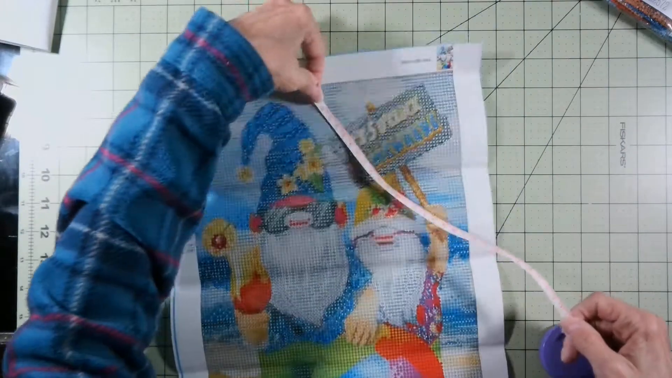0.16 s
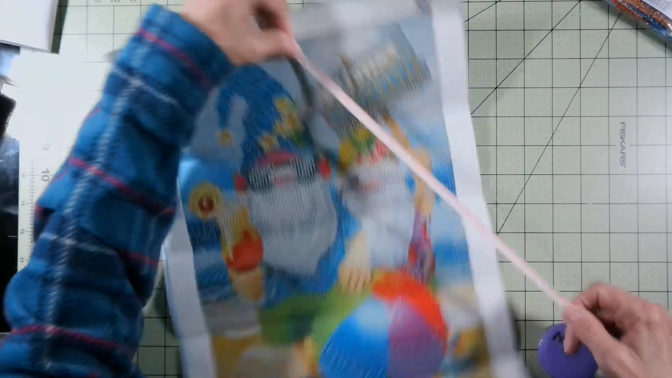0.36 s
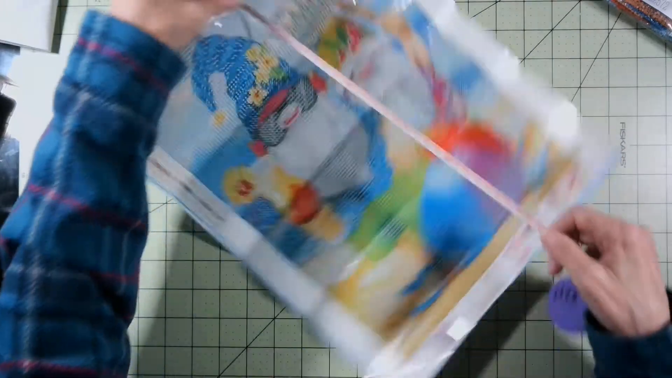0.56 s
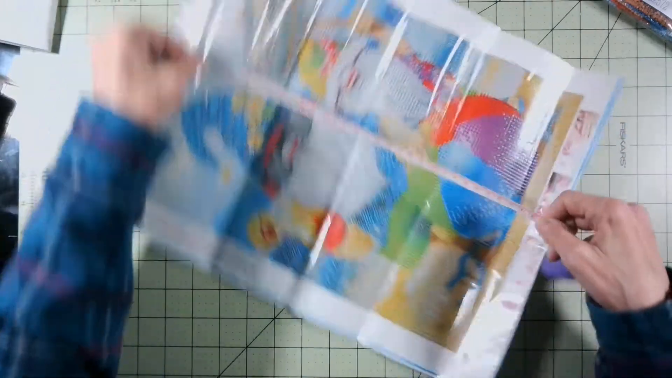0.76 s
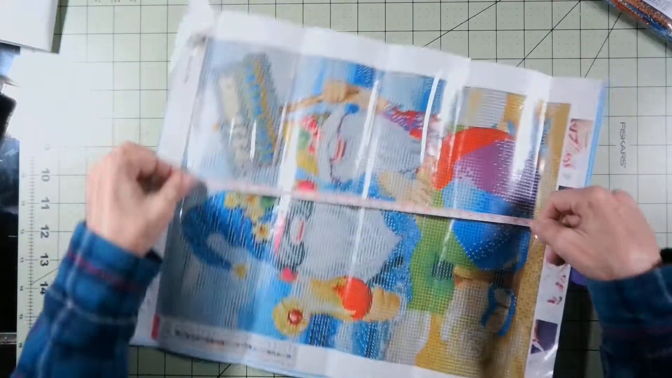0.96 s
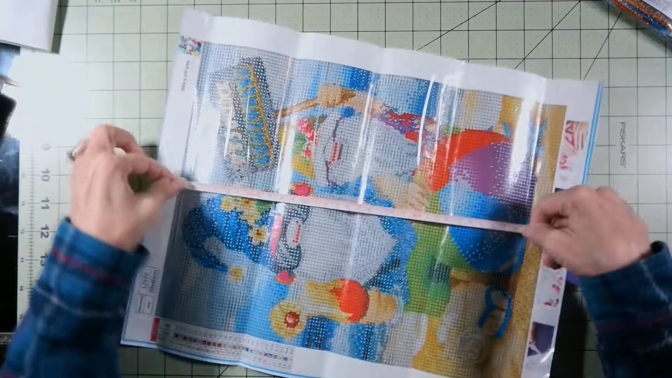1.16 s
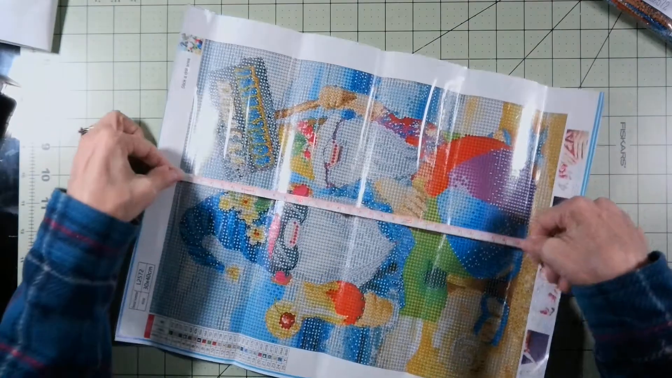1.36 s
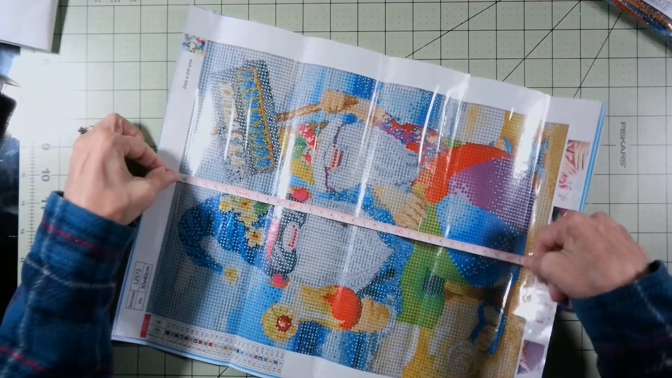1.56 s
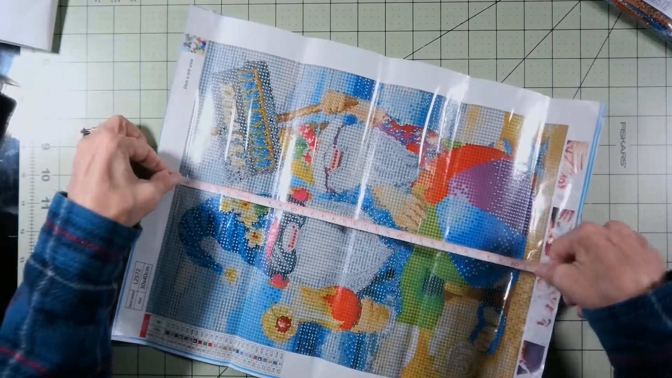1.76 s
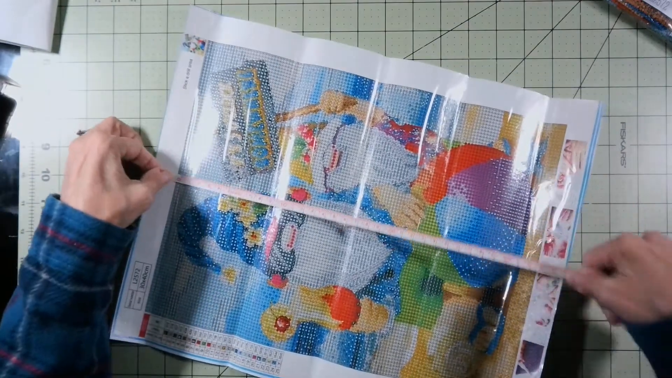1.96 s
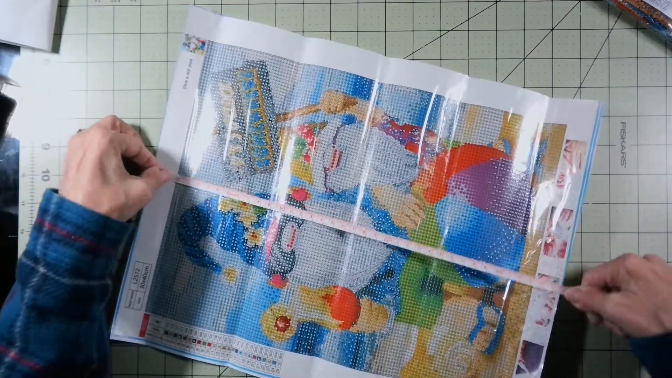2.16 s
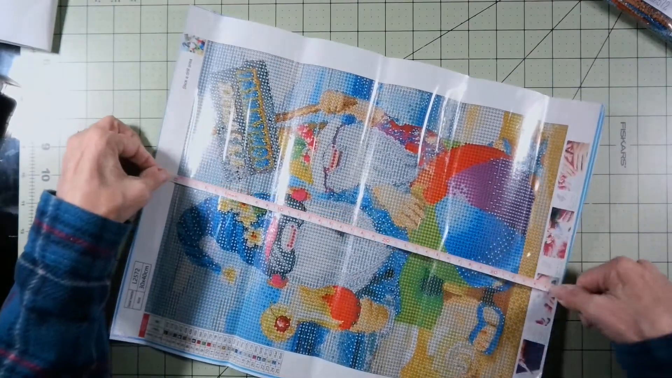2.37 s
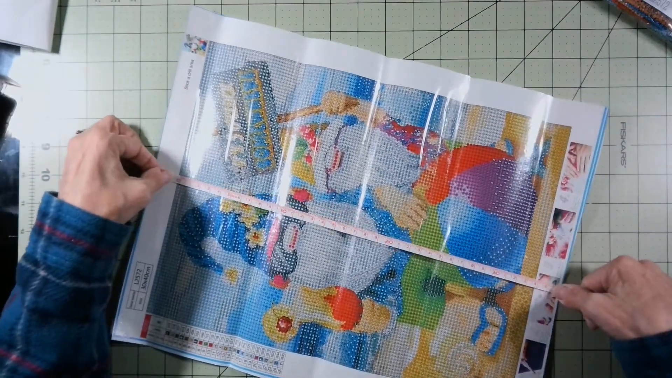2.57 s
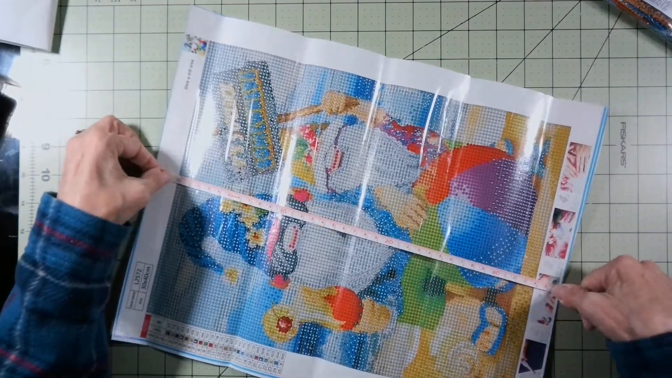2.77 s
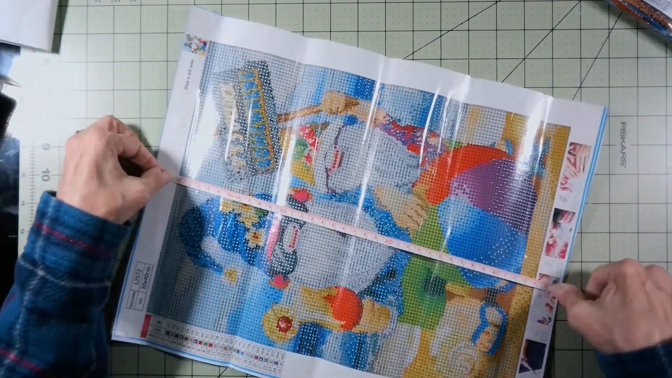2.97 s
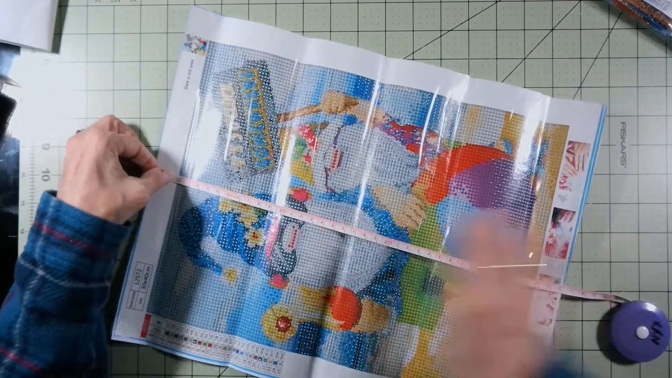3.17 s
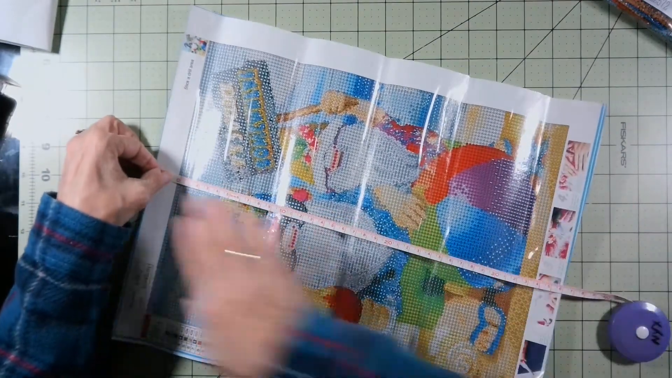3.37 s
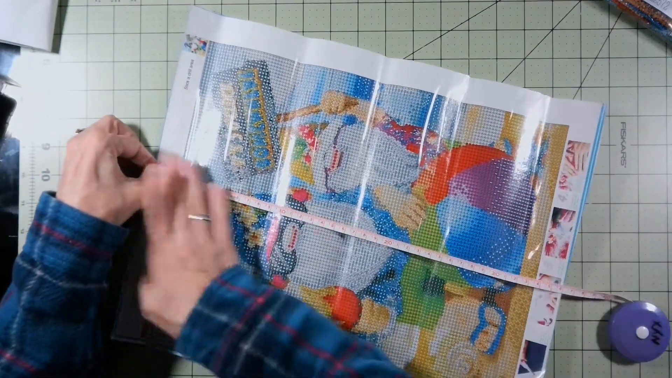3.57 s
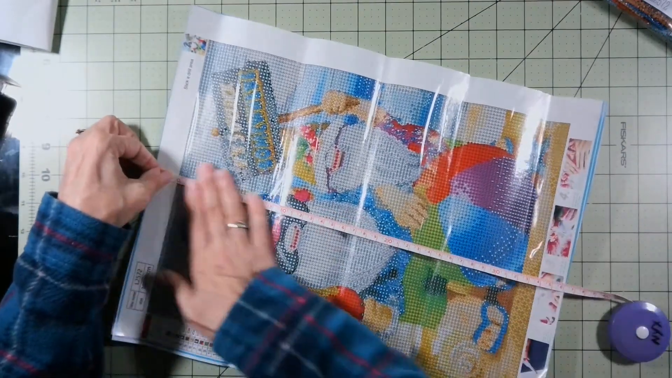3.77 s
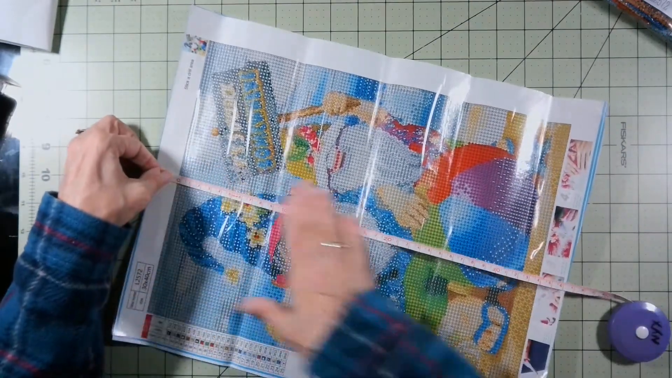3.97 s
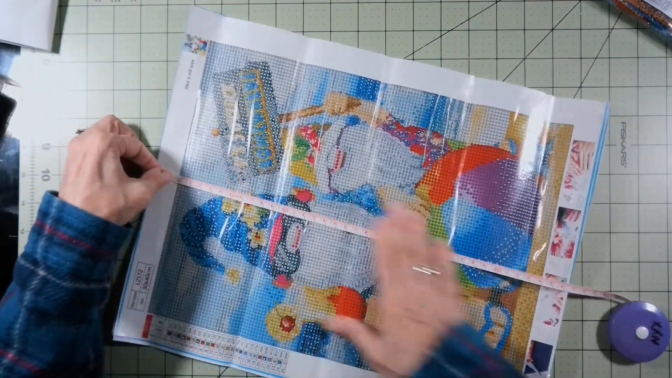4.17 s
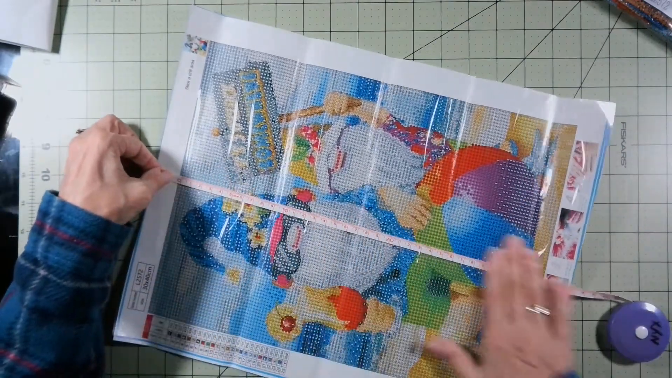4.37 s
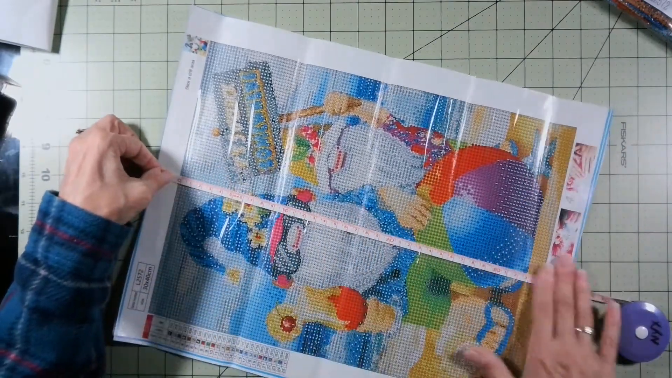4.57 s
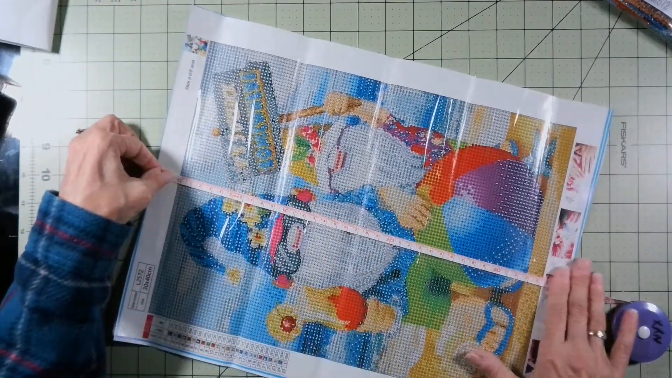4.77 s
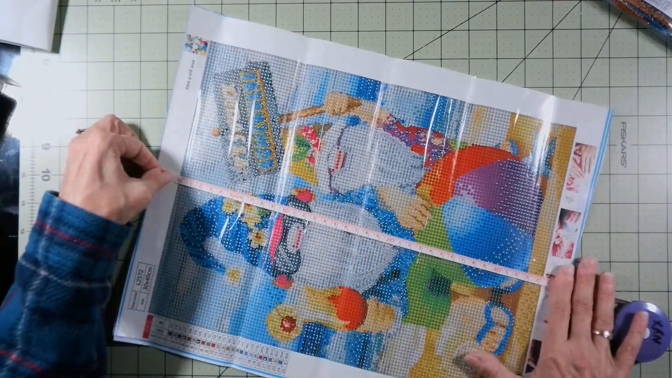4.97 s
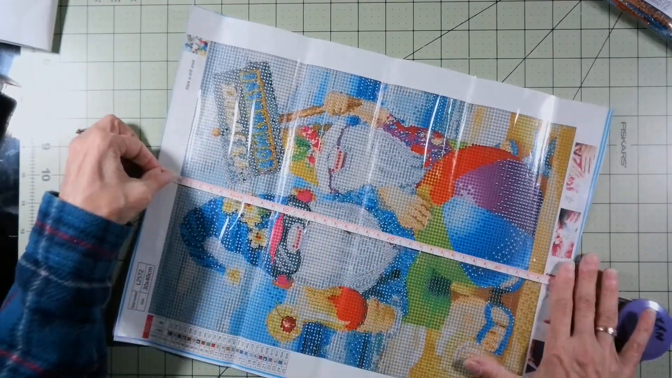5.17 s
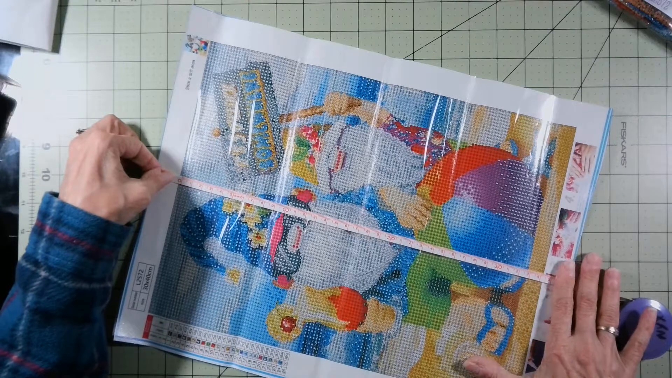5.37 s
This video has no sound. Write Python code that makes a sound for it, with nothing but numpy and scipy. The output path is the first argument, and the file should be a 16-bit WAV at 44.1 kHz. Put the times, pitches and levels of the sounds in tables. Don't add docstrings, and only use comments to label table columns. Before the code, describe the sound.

Close, dry stereo sound in a small room with a faint microphone hiss. A brief rustle opens, with a few crisp film snaps, then at about 0.25 s the film-covered canvas swings round on the mat: a grainy hiss swelling to its loudest near 0.55 s, dipping, and surging again around 0.85 s, stopping by 1.1 s. From 1.2 to 2.3 s come scattered crinkles, small ticks and a short scrape near 1.85 s as hands and tape settle. At 2.42 s one very hard, bright tap cracks out, slightly overloaded, with a short woody knock. Near quiet follows, then a sharp snap at 3.02 s and smaller ones after. At 3.6 s a palm lands with a soft low thump and sweeps until about 4.5 s, a steady hiss full of dense crackles, with a stronger rub near 3.96 s. Sparse tiny film ticks remain until 5.4 s.

```python
import sys
import numpy as np
from scipy import signal
from scipy.fft import rfft, irfft
from scipy.io import wavfile
from scipy.ndimage import uniform_filter1d

SR = 44100
rng = np.random.default_rng(int(sys.argv[2]) if len(sys.argv) > 2 else 0)


def transcribe(u):
    v = np.clip(np.atleast_2d(u).T, -1, 1)
    q = np.round(v * 32767).astype(np.int16)
    wavfile.write(sys.argv[1], SR, q)


def elevation(decibels):
    levels = np.asarray(decibels, float)
    return 10 ** (levels / 20)


N = 239110

# time in seconds, speed as level in dB, weight on the mat in dB.
SWING = [
    (.215, -57, 7),
    (.24, -36.5, -2),
    (.311, -40.5, -5),
    (.38, -35, -7),
    (.43, -30, -6),
    (.541, -24.5, -9),
    (.657, -40, -8.5),
    (.844, -31, -2),
    (1.02, -42.5, -9.5),
    (1.1, -63, -23),
]
# time in seconds, speed as level in dB.
SWEEP = [
    (3.6, -50),
    (3.72, -42.5),
    (3.85, -43),
    (3.893, -40.5),
    (3.997, -40.5),
    (4.081, -38.5),
    (4.113, -42),
    (4.266, -40.5),
    (4.496, -45.5),
    (4.69, -62),
]
# peak time in seconds, time to fade 20 dB in seconds,
# level in dB, weight in dB, brightness in dB.
BRUSHES = [(.005, 0.1, -30.5, -5, -2.5), (.07, .03, -47.5, -1, -8), (0.168, 0.065, -42, -4, 0),
           (1.088, 0.06, -53, -10, 9), (1.219, 0.1, -56.5, 2.2, -1), (1.367, 0.45, -56.5, -8, 2.5),
           (1.554, 0.2, -59.5, 3.5, 1), (1.715, 0.05, -56, -6, 3), (1.756, 0.3, -55.5, -5, 1),
           (1.81, 0.24, -63, 15.5, -3), (1.851, 0.048, -32.5, -15, -9), (1.9, .09, -53, -19, 12),
           (1.952, 0.065, -42.5, -8.5, -11), (2.1, 0.2, -67, -9, 12), (2.169, 0.6, -64.5, -8, -11),
           (2.27, 0.1, -58.5, -12.5, -11.5), (2.4, 0.5, -62.5, 1.6, 4.5), (2.634, 0.5, -66, -5.5, -5.5),
           (2.883, 0.15, -50.5, -7.5, -3), (2.995, 0.2, -51.5, -1.5, 1), (3.465, 0.6, -65.5, -15, 8),
           (3.959, 0.0444, -33.5, -8.5, 1.1), (4.301, 0.16, -46.5, -26, 16), (5.029, 1.5, -67.5, -1.7, 6.5),
           (5.332, .08, -58.5, -3, -2)]
# time in seconds, level in dB.
CRACKLE = [(0, -10), (.22, 2), (.3, -8), (.9, -4.5), (1.05, -1), (1.15, -9.5), (3.55, -10.5), (3.62, -5.5),
           (4.5, -3.5), (4.8, -6.5), (5.42, -8)]

# centre in Hz, width in Hz, level in dB.
RUBBED_CANVAS = [(750, 400, -10), (1400, 500, -0.5), (1950, 700, 0.5), (2800, 1400, -3)]
RUBBED_FILM = [(2620, 1500, -10.5), (3770, 1300, -2), (5620, 2020, 3), (7260, 3700, -2.5)]
RUBBED_FILM_TOP = [(10200, 6000, -7.5), (14100, 1900, 3), (15300, 1400, 1)]
TICKED_CANVAS = [(850, 500, -13), (1500, 600, -1), (2100, 900, 0), (2800, 1000, -6)]
FLIPPED_FILM = [(3800, 1600, -3), (5650, 2000, 2.5), (7800, 3000, -.5)]
FLIPPED_FILM_TOP = [(11000, 6000, -9), (14050, 1960, 3), (15440, 2100, -1.5)]
STRUCK_CANVAS = [(800, 400, -11), (1400, 550, 1), (1990, 890, -0.5), (2900, 1500, -4)]
STRUCK_FILM = [(3900, 1800, -4), (5600, 1100, 4.5), (7660, 1500, -8.5)]
STRUCK_FILM_TOP = [(10000, 3700, -6.5), (12900, 1800, 1), (15000, 1300, -0.5)]
TABLE_TOP = [(45, 15, 1.5), (130, 41, -3), (300, 170, -9.5), (600, 640, -16.5)]

# time in seconds, level in dB, brightness in dB.
TURN_AND_TAPE_SNAPS = [(0.0066, -39, 22), (0.0243, -23, 2), (0.1044, -29, -13), (0.1065, -38, 9), (0.1259, -38, 13),
                       (0.164, -34, 6), (0.1799, -31, -4), (0.2808, -28, 2), (0.3343, -24, 0), (0.3757, -16, 2),
                       (0.739, -20, 5), (0.7569, -31, 12), (0.787, -21, -2), (0.96, -37, 1), (0.9868, -25, 5),
                       (1.033, -28, 6), (1.0425, -41, 23), (1.0514, -45, 20), (1.0748, -39, 29), (1.0787, -46, 31),
                       (1.0915, -42, 24), (1.0952, -35, 11), (1.109, -38, 9), (1.1606, -43, -4),
                       (1.2294, -34, -2), (1.3257, -40, -6), (1.4796, -33, -4), (1.506, -21, -9), (1.608, -57, -3),
              (1.6837, -40, 20), (1.6866, -24, -15), (1.7037, -45, 15), (1.721, -30, 9), (1.738, -30, 4),
              (1.76, -28, 4), (1.89, -37, 12), (1.9191, -27, 13), (1.931, -36, 14), (1.9593, -32, 12),
              (2.008, -55, 19), (2.0307, -34, 3), (2.2441, -30, 5), (2.2617, -31, -30), (2.397, -48, 11),
              (2.523, -41, 12), (2.587, -57, 6), (2.7415, -44, 2), (2.77, -43, 0), (2.8474, -51, 12),
              (2.945, -35, -20), (3.0262, -12, 0), (3.0288, -17, -3), (3.0308, -24, -9), (3.0812, -17, -14),
              (3.0931, -26, -5),
                       (0.138, -34, -2), (0.1572, -38, 6), (0.789, -21, -1), (0.9761, -39, 11),
                    (1.036, -49, 22), (1.054, -46, 19), (1.0684, -56, 24), (1.1715, -55, 5),
                    (1.2239, -44, -5), (1.342, -45, -13), (1.3533, -46, 0), (1.4418, -52, 6),
                    (1.4471, -47, 6), (1.5222, -38, 3), (1.5539, -49, 8), (1.7654, -45, 10),
                    (1.7707, -45, 7), (1.9062, -39, 5), (1.9461, -39, 8), (2.019, -43, -11),
                    (2.0352, -41, -5), (2.1543, -43, -5), (2.4074, -55, 4), (2.8767, -48, 6),
                    (2.8871, -33, -11), (2.89, -42, 8), (2.8978, -52, 12), (3.0741, -26, -4),
                    (5.0106, -55, 9), (5.0295, -53, 10), (5.2292, -55, 5), (5.4075, -54, -2)]
# time in seconds, level in dB,
# brightness in dB.
PALM_AND_SETTLING_SNAPS = [(3.6132, -23, -13), (3.6159, -31, 12), (3.6259, -20, -3), (3.6313, -16, -16),
                           (3.6427, -28, -3), (3.7126, -27, 10), (3.7235, -28, -6), (3.7367, -38, 20), (3.7465, -24, 11),
                           (3.816, -25, -1), (3.9299, -27, 0), (3.947, -23, 0), (3.9589, -18, -1), (3.9874, -28, -22),
                           (4.0126, -25, -6), (4.0347, -22, -2), (4.039, -33, 5), (4.0563, -23, 0), (4.0975, -24, 1),
                           (4.1017, -21, -21), (4.122, -32, 18), (4.1322, -17, 3), (4.217, -30, -2), (4.2327, -29, -15),
                           (4.2557, -37, 13), (4.2872, -40, 28), (4.3223, -40, 20), (4.3665, -27, 4), (4.381, -24, 5),
                           (4.438, -39, 9),
                           (3.6096, -43, 18), (3.652, -29, -6), (3.6568, -35, 5), (3.6782, -45, 15),
                    (3.6856, -50, 18), (3.6925, -43, 10), (3.705, -51, 23), (3.7436, -31, 4),
                    (3.7731, -37, -1), (3.8041, -35, 3), (3.855, -34, -4), (3.9046, -34, 2),
                    (3.9073, -41, 16), (3.966, -25, -4), (4.005, -40, 8), (4.0479, -28, 3),
                    (4.0666, -29, -5), (4.107, -26, -7), (4.1135, -22, -2), (4.1155, -25, -2),
                    (4.1264, -27, 12), (4.17, -41, 10), (4.2037, -34, 0), (4.2079, -35, 7),
                    (4.2204, -43, 14), (4.2739, -31, 1), (4.2793, -45, 19), (4.3024, -43, 24),
                    (4.3104, -40, 19), (4.3256, -45, 17), (4.3182, -44, 22), (4.4869, -51, 12),
                           (4.2838, -34, 15), (4.308, -39, 18), (4.581, -43, 13), (4.6213, -42, 5), (4.664, -52, 16),
                  (4.9669, -34, 5), (5.024, -53, 14), (5.0679, -48, 7), (5.087, -50, 4), (5.1422, -37, 4),
                  (5.1797, -41, 0), (5.1877, -49, 10), (5.2113, -52, 8), (5.2367, -53, 15),
                  (5.3067, -48, 11), (5.3183, -40, 21), (5.3276, -44, 8), (5.3383, -28, -2)]
# time in seconds, level in dB.
TICKS = [(0.757, -44), (1.229, -33), (1.505, -33), (1.523, -43), (1.6092, -43), (1.7164, -35), (1.721, -38),
         (2.2613, -23), (2.89, -44), (2.9506, -39), (3.031, -31), (3.0748, -36), (3.6135, -35),
         (3.6274, -19), (3.7445, -52), (3.8148, -41), (3.855, -51), (3.9638, -24), (4.012, -44),
         (4.1843, -36), (4.493, -43), (4.9227, -47), (0.1506, -52), (0.1731, -43), (0.323, -33),
         (0.665, -39), (1.0961, -49), (1.3538, -54), (1.5138, -43), (2.079, -54), (2.2646, -35),
         (2.3902, -50), (3.1071, -37), (3.8052, -48), (3.924, -47), (3.9415, -45), (3.971, -37),
         (3.9971, -49), (4.0336, -45), (4.0545, -42), (4.123, -43), (4.257, -47), (5.0153, -51),
         (5.3252, -50)]
# start in seconds, level in dB, weight in dB,
# brightness in dB, rattle t60 in seconds.
TAPS = [(.151, -43, -16, 15.5, 0.095), (1.2267, -38.5, 2, 1.5, 0.046), (1.5045, -31, -11, -10, 0.056),
        (1.607, -37.5, -14, -21, 0.029), (2.26, -40, 5, -30, 0.11), (2.4185, -28, 0, -4, 0.1),
        (2.4223, -1, -18, -5, .032), (2.4222, -1, -20, -3, .007), (2.4226, -9, -8, -2, 0.02),
        (2.429, -23, -10, -6.5, 0.2), (3.021, -32, -3, -16, 0.019), (3.0224, -25.5, -14, -4.5, 0.13),
        (3.08, -26.5, -7.5, -2, 0.046), (3.093, -32.5, -16, -2.5, 0.06), (3.605, -35.5, 1, 3.5, 0.15),
        (3.627, -21, -7, -6, 0.01), (3.742, -22.5, -16, -5, 0.012), (4.098, -31, -15, 7, 0.11)]
# start in seconds, length in seconds, level in dB,
# first pitch in Hz, last pitch in Hz.
SCRAPES = [
    (0.329, 0.2, -45, 1800, 1980),
    (0.534, 0.051, -48.5, 1430, 1340),
    (0.652, 0.041, -53, 1370, 1400),
    (1.778, 0.05, -53, 1400, 1600),
    (1.838, 0.02, -33.5, 1750, 1800),
    (1.865, 0.022, -53, 1700, 1500),
    (2.109, 0.006, -63, 810, 820),
    (2.128, .007, -62, 810, 820),
    (2.874, 0.011, -59, 1310, 1310),
]
# time in seconds, level in dB.
RUMBLE = [(0.0, -58), (.84, -55), (.95, -58), (1.1, -61.5), (1.3, -61), (1.62, -62.5), (1.87, -57),
          (2.15, -68), (2.66, -72.5), (3.05, -56.5), (3.2, -72), (3.58, -75), (3.66, -61), (4.15, -57),
          (4.45, -61), (4.66, -71), (5.1, -74), (5.42, -73)]
# start in seconds, level in dB, pitch in Hz, t60 in seconds.
THUMPS = [(.022, -51, 750, .1), (.06, -53, 720, .06), (.23, -54, 330, .04), (.237, -52, 620, .06),
          (3.6, -50, 420, .06), (0.255, -54, 320, 0.042), (.318, -52, 363, 0.054), (.46, -49, 20, .25),
          (.51, -46, 20, .25), (.77, -51, 45, .15), (.845, -51, 48, .2), (.38, -52, 55, .12),
          (.75, -54, 196, .08), (.525, -54, 210, .06), (1.005, -51, 290, .06), (1.006, -53, 470, .05),
          (1.008, -51, 101.5, .1), (1.228, -46, 50, 0.2), (1.233, -47.5, 292, .092), (1.72, -50, 600, .03),
          (1.9, -56, 45, .15), (1.945, -52, 600, 0.035), (2.258, -55, 35, .15), (2.262, -54, 100, 0.14),
          (2.263, -45, 300, .027), (2.423, -51, 170, 0.087), (2.424, -28.5, 806, .064),
          (2.425, -42, 361, 0.056), (3.028, -48, 130, .068), (3.436, -49, 127, .1), (3.45, -56, 260, .05),
          (2.428, -44, 22, .2), (3.612, -37, 130, .16), (3.626, -43, 750, .04), (3.627, -49, 350, .05),
          (3.629, -46, 45, 0.31), (3.961, -48, 45, .29), (4.1, -46, 50, .3), (4.105, -50, 135, .09),
          (4.16, -49, 45, .15), (4.19, -56, 290, .1), (3.957, -48, 116, .09), (5.18, -60, 105, .15),
          (5.27, -59, 105, .15), (5.35, -59, 105, .2), (4.76, -61, 105, .15), (5.135, -59, 45, .08),
          (4.38, -56, 350, .04), (4.29, -54, 40, .1), (4.355, -54, 55, .1)]
# time in seconds, delay of the left capsule in seconds.
LEFT_LAG = [(0, .00011), (.3, -.00002), (1.2, -.00004), (1.45, .00014), (3.3, .00014), (3.55, -.00004),
            (4.2, .00004), (5.0, .00013), (5.42, .00013)]
# frequency in Hz, density in dB per Hz.
SELF_NOISE = [(25, 8), (45, -.5), (110, 5.5), (250, 2), (600, -1.5), (1500, -6.5), (4000, -9.5),
              (9000, -12.5), (14000, -13), (16000, -19)]


def rms_one(x):
    return x / np.sqrt(np.mean(x ** 2) + 1e-20)


def in_time(rows):
    s, *columns = np.transpose(rows)
    return [np.interp(np.arange(N) / SR, s, c) for c in columns]


def drift(rate_hz):
    r = np.exp(-2 * np.pi * rate_hz / SR)
    slow = signal.lfilter([1], [1, -2 * r, r * r], rng.standard_normal(N + SR))
    return rms_one(slow[SR:])


def pair(alike):
    common, left, right = rng.standard_normal((3, N))
    alike = np.clip(alike, 0, 1)
    return np.sqrt(alike) * common + np.sqrt(1 - alike) * np.array([left, right])


def grains(per_s, spread_db, alike):
    sizes = elevation(spread_db * np.minimum(rng.exponential(1, N), 4))
    clicks = sizes * (rng.random(N) < per_s / SR)
    return rms_one(signal.lfilter([1], [1, -.8], clicks) * pair(alike))


def resonate(x, modes):
    def bank(v):
        out = 0
        for k, (hz, width, db) in enumerate(modes):
            r = np.exp(-np.pi * width / SR)
            a = [1, -2 * r * np.cos(2 * np.pi * hz / SR), r * r]
            ring = signal.lfilter([1 - r * r, 0, r * r - 1], a, v + 1e-18)
            out = out + (-1) ** k * elevation(db) * ring
        return out
    impulse = np.eye(1, 8192)[0]
    return bank(x) / np.sqrt(np.sum(bank(impulse) ** 2))


def gliding(x, hz, width):
    out, state = np.zeros_like(x), np.zeros((2, 2))
    for i in range(0, N, 256):
        r = np.exp(-np.pi * width[i] / SR)
        a = [1, -2 * r * np.cos(2 * np.pi * hz[i] / SR), r * r]
        part, state = signal.lfilter([1, 0, -1], a, x[:, i:i + 256], zi=state)
        out[:, i:i + 256] = part * np.sqrt((1 - r * r) / 2)
    return out


def bursts(times, levels_db, t60s, rises):
    out = np.zeros(N)
    for s, db, t60, rise in zip(times, levels_db, t60s, rises):
        at = int(s * SR)
        t = np.arange(min(int(t60 * SR) + 2, N - at)) / SR
        out[at:at + len(t)] += (1 - np.exp(-t / rise)) * elevation(db - 60 * t / t60)
    return out


def contact():
    t = np.arange(N) / SR
    swing_db, weight_db = in_time(SWING)
    sweep_db, = in_time(SWEEP)
    swinging = (t > SWING[0][0]) * (t < SWING[-1][0])
    sweeping = (t > SWEEP[0][0]) * (t < SWEEP[-1][0])
    power = elevation(2 * np.array([swing_db + weight_db, swing_db, swing_db - 0.36])) * swinging
    power += elevation(2 * (sweep_db + [[-17.5], [-5], [0]])) * sweeping
    for s, fade, db, weight, bright in BRUSHES:
        away = np.maximum((s - t) / 0.64, t - s) / fade
        swell = elevation(2 * np.maximum(db - 20 * away, -150))
        power += elevation(2 * np.array([[weight], [0], [bright]])) * swell
    return 10 * np.log10(power)


def sliding():
    body_db, hiss_db, fizz_db = contact()
    creasing = elevation(in_time(CRACKLE)[0])
    clumps = np.minimum(creasing, 1.2) * drift(35)
    crackle = creasing * grains(700, spread_db=3.0, alike=.7)
    radiation = signal.butter(2, 600, "high", fs=SR, output="sos")
    body = signal.sosfilt(radiation, resonate(pair(0.43), RUBBED_CANVAS))
    hiss = resonate(pair(0.13) + 0.8 * crackle, RUBBED_FILM)
    fizz = resonate(pair(0.039) + 0.85 * crackle, RUBBED_FILM_TOP)
    film = elevation(hiss_db - 1.5 + 2.0 * clumps) * hiss + elevation(fizz_db - 2.5 + 2.5 * clumps) * fizz
    return elevation(body_db - 1.5 + 1.5 * drift(30)) * body + film


def creases():
    turn_and_tape = TURN_AND_TAPE_SNAPS
    palm_and_after = PALM_AND_SETTLING_SNAPS
    s, db, bright = np.transpose(turn_and_tape + palm_and_after)
    tick_s, tick_db = np.transpose(TICKS)
    return np.hstack([[s, db - 25 + 0.17 * bright, db, db + bright],
                      [tick_s, tick_db, tick_db - 8, tick_db - 11]])


def snaps():
    s, body_db, hiss_db, fizz_db = creases()
    chance = rng.standard_normal((len(s), 3, 256))
    t = np.arange(256) / SR
    phase = t / (.00016 * elevation(3 * chance[:, :1, :1]))
    settling = 0.11 * np.exp(-t / 0.0021) * np.minimum(phase, 1)
    flips = (chance[:, :1] + .5 * chance[:, 1:]) * (phase * np.exp(-phase) + settling)
    body = body_db + 3.5, TICKED_CANVAS, 750
    hiss = hiss_db - .6, FLIPPED_FILM, 2800
    fizz = fizz_db + 1.5, FLIPPED_FILM_TOP, 9000
    out = np.zeros((2, N + 256))
    for db, modes, low_hz in (body, hiss, fizz):
        high_pass = signal.butter(3, low_hz, "high", fs=SR, output="sos")
        rings = signal.sosfilt(high_pass, resonate(flips, modes))
        power = uniform_filter1d(2 * np.mean(rings ** 2, axis=1), size=16)
        heights = np.sqrt(power.max(axis=1))
        peaks = np.argmax(np.abs(rings[:, 1]), axis=1)
        at = np.maximum((s * SR).astype(int) - peaks, 0)[:, None] + np.arange(256)
        for side in range(2):
            np.add.at(out[side], at, rings[:, side] * (elevation(db) / heights)[:, None])
    return out[:, :N]


def taps():
    s, db, weight, bright, t60s = np.transpose(TAPS)
    rises = 0.022 * t60s
    noise = grains(9000, spread_db=2.5, alike=.6)
    canvas = db + weight, STRUCK_CANVAS, noise[:, ::-1]
    film = db, STRUCK_FILM, noise
    film_top = db + bright, STRUCK_FILM_TOP, noise
    return sum(resonate(own * bursts(s, level_db, t60s, rises), modes)
               for level_db, modes, own in (canvas, film, film_top))


def scrape_course():
    t = np.arange(N) / SR
    course, levels_db = [], []
    for s, length, db, first_hz, last_hz in SCRAPES:
        course += [(s, first_hz, db), (s + length, last_hz, db)]
        outside = np.maximum(np.maximum(s - t, t - s - length), 0)
        levels_db.append(db - 1900 * outside)
    hz, strength_db = in_time(course)
    width = hz * 0.08 * elevation(0.42 * (strength_db + 57.0))
    return hz, width, np.max(levels_db, axis=0)


def scraping():
    hz, width, db = scrape_course()
    rubbing = grains(4000, spread_db=2.5, alike=.8) * np.sqrt(1.5 * np.pi * width / SR)
    roughness = elevation(1.5 * drift(60))
    once = gliding(rubbing, hz, 1.4 * width)
    return elevation(db) * roughness * 2.18 * gliding(once, hz, 1.37 * width)


def table():
    s, db, hz, t60s = np.transpose(THUMPS)
    octaves = np.log2(np.maximum(hz, 50) / 50)
    shudder_db = db - 8 - 3.5 * octaves
    shudder = bursts(s, shudder_db, np.full(len(s), 0.28), np.full(len(s), .01))
    unevenness_db = 1.2 * drift(2.8)
    rumble = elevation(in_time(RUMBLE)[0] + unevenness_db)
    out = (rumble + shudder) * resonate(pair(0.62), TABLE_TOP)
    for s, db, hz, t60 in THUMPS:
        at = int(s * SR)
        t = np.arange(min(int(t60 * SR), N - at)) / SR
        envelope = (1 - np.exp(-t * hz / 0.44)) * elevation(db + 6.0 - 60 * t / t60)
        out[:, at:at + len(t)] += np.sin(2 * np.pi * hz * t) * envelope
    return out


def room(x):
    t60_s, level_db, alike_hz, top_hz = 0.18, -8.5, 1500, 16000
    t = np.arange(int(.4 * SR)) / SR
    decay = elevation(-60 * t / t60_s) * (1 - np.exp(-(t / 0.0011) ** 2))
    common, *own = rng.standard_normal((3, len(t))) * decay
    long_waves = signal.butter(1, alike_hz, fs=SR)
    echoes = own + signal.lfilter(*long_waves, common - 0.31 * np.array(own))
    echoes = signal.lfilter(*signal.butter(1, top_hz, fs=SR), echoes)
    echoes = echoes / np.sqrt(np.sum(echoes ** 2, axis=1))[:, None]
    mono = x.mean(axis=0, keepdims=True)
    return elevation(level_db) * signal.fftconvolve(mono, echoes, axes=1)[:, :N]


def self_noise():
    hz, db = np.transpose(SELF_NOISE)
    grid = np.fft.rfftfreq(N, 1 / SR) + 1
    colour = elevation(np.interp(np.log(grid), np.log(hz), db, left=-30))
    return elevation(-58.5) * rms_one(irfft(rfft(pair(0.023)) * colour, N))


def scene():
    snapping = snaps()
    rest = sliding() + scraping() + taps()
    direct = snapping + rest
    lag = np.round(in_time(LEFT_LAG)[0] * SR)
    left = np.interp(np.arange(N) - lag, np.arange(N), direct[0])
    wet = room(rest + elevation(-4.5) * snapping)
    return np.array([left, direct[1]]) + wet + table() + self_noise()


def band_limit(x):
    return signal.sosfilt(signal.butter(12, 16430, fs=SR, output="sos"), x)


def record(dry):
    swell_band = signal.butter(2, [6, 22], "band", fs=SR, output="sos")
    swell = signal.sosfilt(swell_band, np.clip(dry, -.2, .2) ** 2)
    overloaded = np.clip(dry + 0.4 * swell, -.95, .95)
    top_cut = signal.cheby2(14, 36, 16350, fs=SR, output="sos")
    mix = signal.sosfilt(top_cut, overloaded)
    return band_limit(mix)


dry = scene()
out = record(dry)
transcribe(out)
```